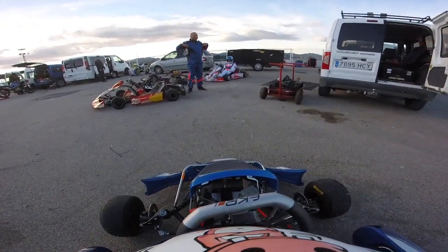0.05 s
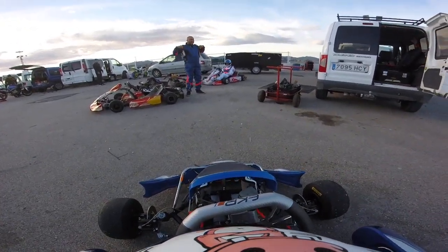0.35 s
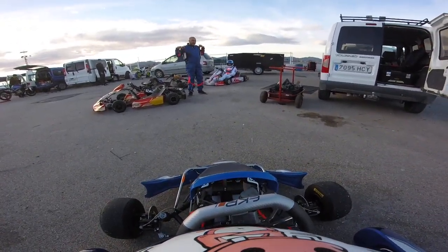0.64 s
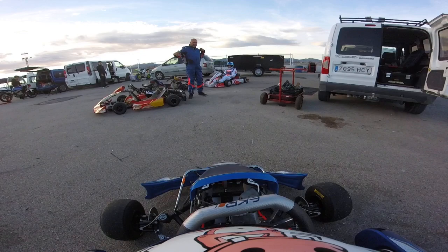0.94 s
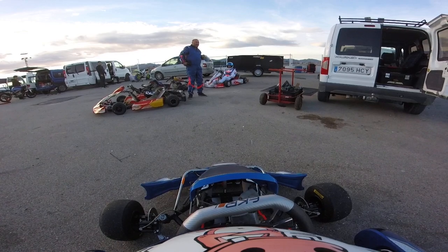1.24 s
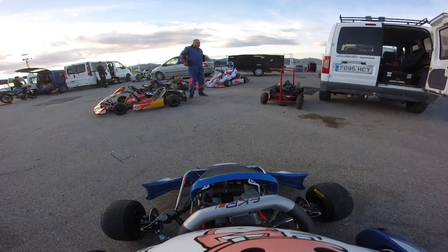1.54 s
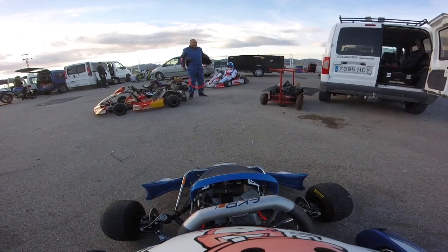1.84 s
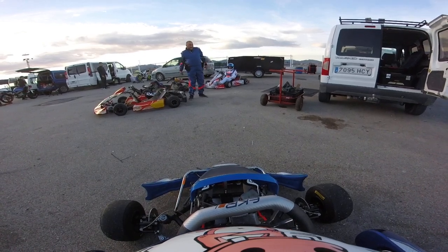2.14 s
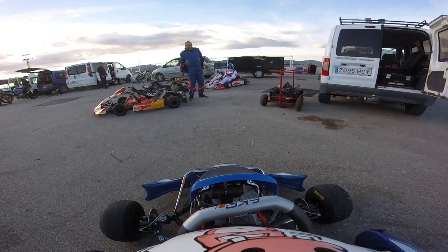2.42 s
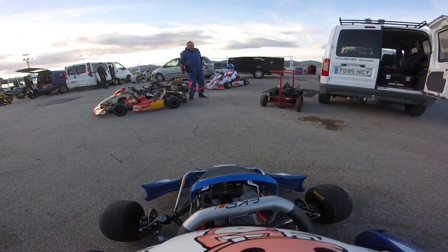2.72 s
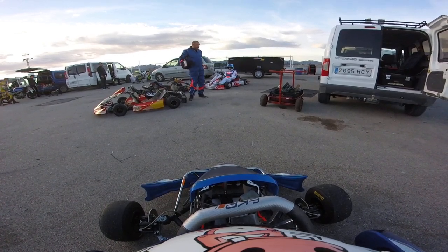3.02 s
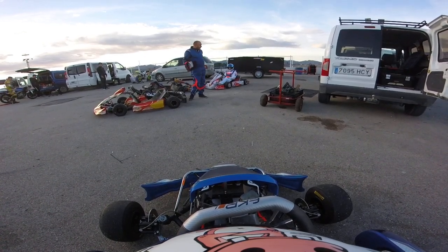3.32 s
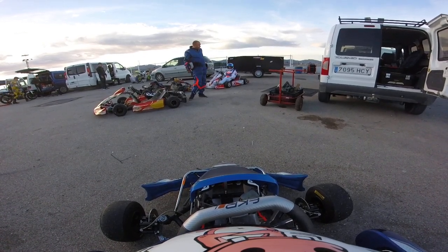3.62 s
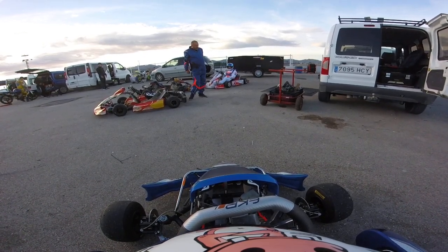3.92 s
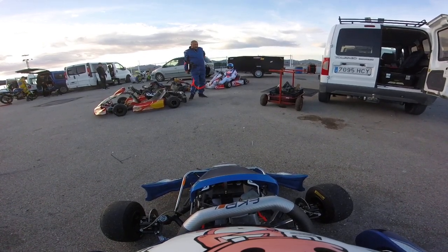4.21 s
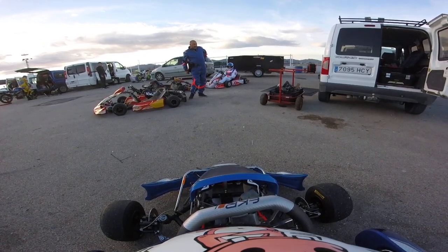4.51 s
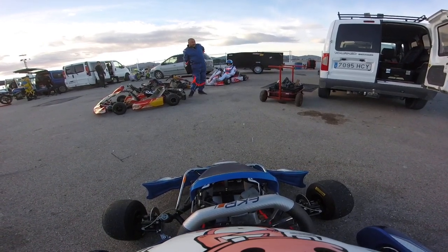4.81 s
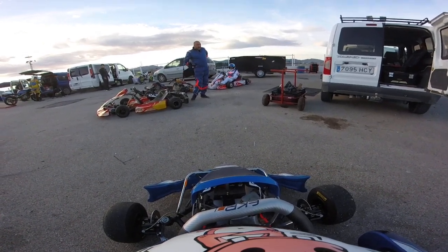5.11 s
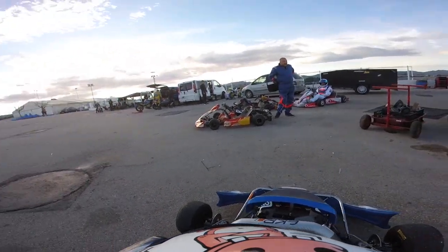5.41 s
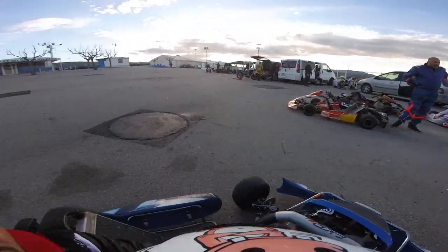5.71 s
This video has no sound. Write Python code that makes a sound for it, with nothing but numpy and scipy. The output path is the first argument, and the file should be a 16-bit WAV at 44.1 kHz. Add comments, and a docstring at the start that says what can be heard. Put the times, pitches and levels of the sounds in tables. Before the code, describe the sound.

A two-stroke racing kart engine idles throughout, heard close up from the seat in an open paddock. The exhaust booms in low, choppy, irregular throbs, with a falling drone in the gaps where the engine coasts. A quieter metallic clatter and faint hiss run underneath, and loose bodywork buzzes and knocks lightly on the stronger beats. For the first 1.2 seconds there are light, almost even metallic ticks. The engine speeds up briefly around 1.4 seconds, sags by about 2.1, picks up again near 2.5, then throbs more densely from about 3 seconds on. At about 5.2 seconds a short scuff and a bump sound right on the microphone. The boom then recedes and the mechanical clatter comes forward, with a few more dull bumps and a low gust of air just before 6 seconds.

```python
"""An open paddock, from the seat of an idling racing kart, the microphone close to its two-stroke single.
The engine fires only on some turns and coasts down between them, so the silencer booms in choppy throbs
with a falling drone between. The mechanism clatters on every turn, strong throbs buzz the bodywork,
and the slack drive ticks at first. At the end the microphone swings towards the engine with a scuff
and a few bumps: the boom recedes and the clatter comes forward."""
import sys
import numpy as np
from scipy import signal
from scipy.fft import rfft, irfft, next_fast_len
from scipy.io import wavfile
from scipy.ndimage import uniform_filter1d, minimum_filter1d

SR = 44100
rng = np.random.default_rng(int(sys.argv[2]) if len(sys.argv) > 2 else 0)


def generate_wav(sig):
    """Save sig (samples, or channels by samples) to the path in sys.argv[1] as 16-bit PCM at SR."""
    pcm = np.round(np.clip(np.atleast_2d(sig).T, -1, 1) * 32767).astype(np.int16)
    wavfile.write(sys.argv[1], SR, pcm)


N = 262395
TIME = np.arange(N) / SR

# a scuff right by the microphone: time_s, level_db
SCUFF_LEVEL = [(5.15, -81), (5.19, -41.5), (5.215, -41), (5.235, -34), (5.255, -35), (5.27, -71)]
# tone of that scuff: frequency_hz, gain_db
SCUFF_SPECTRUM = [(100, -4.5), (300, 8), (700, -1), (1500, 1), (2500, -2.5), (4000, -8), (6500, -21.5),
                  (9000, -34.5), (16000, -43)]
# air buffeting the swinging microphone: time_s, level_db
BUFFET_LEVEL = [(5.5, -55), (5.78, -36), (5.85, -32), (5.9, -38), (5.95, -19)]
# bumps on the microphone: crest_s, level_db, pitch_hz, half_length_s
MIC_BUMPS = [(5.255, -22, 138, 0.02), (5.76, -25.5, 123, 0.011), (5.85, -11.5, 24.3, 0.013),
             (5.92, -22.5, 120, 0.015)]

# ringing of the slack drive: pitch_hz, width_hz, gain_db
DRIVE_MODES = [(1750, 350, 4), (2860, 39, -2), (3170, 230, 0.5), (3860, 270, -3.5)]
# outright knocks of the bodywork: start_s, level_db
PANEL_KNOCKS = [(0.349, -42.5), (1.138, -48), (1.248, -38), (2.012, -44), (2.067, -40), (2.203, -42),
                (2.283, -45), (2.368, -43), (2.46, -47.5), (3.108, -43.5), (3.743, -42.5), (3.807, -41.5),
                (3.865, -41.5), (4.345, -42), (4.839, -47.5), (4.929, -43)]
# dull rattle of the panels: frequency_hz, gain_db
RATTLE_SPECTRUM = [(100, -2), (220, 6), (330, 2), (520, 0), (800, -7), (1500, -12.5), (3000, -13.5),
                   (5000, -28), (10000, -45.5), (16000, -60)]
# sharp crackle of the panels: frequency_hz, gain_db
CRACKLE_SPECTRUM = [(500, -15.5), (2000, -0.5), (5000, -2.5), (8000, -9), (12000, -21), (16000, -21.5)]

# clatter at the microphone before speed adds to it, rising with the swing: time_s, level_db
CLATTER_LEVEL = [(0, -54.5), (1.9, -54), (2.15, -57), (2.55, -55), (3.0, -52), (3.42, -52), (3.52, -56.5),
                 (4.5, -56), (5.0, -51), (5.35, -53), (5.6, -48.5), (5.9, -44)]
# ringing of crankcase, cylinder and drive together: pitch_hz, width_hz, gain_db
CASE_MODES = [(978, 34, -5.5), (1330, 90, -1.5), (1484, 74, 0.5), (1740, 260, -2.5), (2077, 62, -5),
              (2268, 130, -7.5)]
# whirr under that ringing: frequency_hz, gain_db
WHIRR_SPECTRUM = [(120, -8.5), (250, 2), (500, 0), (750, -7), (1100, -7.5), (1500, -7), (2400, -15),
                  (3500, -13), (4300, -27), (7000, -36), (16000, -73)]
# higher ring of the cylinder: pitch_hz, width_hz, gain_db
CYLINDER_MODES = [(2682, 69, 0.5), (2865, 68, 0), (3098, 55, -1.5), (3360, 210, -5), (3640, 190, -4),
                  (4030, 230, -12)]
# hiss of gas: frequency_hz, gain_db
HISS_SPECTRUM = [(2500, -31.5), (4000, -8.5), (4500, -4), (5050, 0), (5550, -4), (5850, -3.5), (6080, 5.5),
                 (6350, -1.5), (6700, -9), (8000, -10.5), (10000, -17), (13000, -30.5), (16000, -31.5)]
# the two bands in which the inlet sings: pitch_hz, width_hz, gain_db
INLET_MODES = [(3020, 160, 1), (5960, 220, -9)]

# exhaust pipe as heard from the seat: time_s, level_db
PIPE_LOUDNESS = [(0, -24), (.12, -43), (.65, -36), (1.09, -48), (1.15, -35), (1.95, -34), (2.52, -40.5),
                 (2.6, -34.5), (3.02, -33.5), (3.95, -39.5), (4.6, -38), (5.26, -32), (5.35, -45),
                 (5.75, -40.5), (5.95, -44.5)]
# resonances of the pipe: pitch_hz, width_hz
PIPE_MODES = [(142, 9.9), (185, 85)]
# how the pipe passes multiples of the crank speed: frequency_hz, gain_db
PIPE_RESPONSE = [(80, -43), (105, -10), (128, 9), (150, 6.5), (170, -8), (205, -0.5), (235, -15.5),
                 (450, -39.5)]
# how the silencer passes them: frequency_hz, gain_db
SILENCER_RESPONSE = [(25, -29), (45, -16.5), (58, 0.5), (70, 7), (86, -2), (98, -13.5), (112, -29),
                     (150, -46.5)]
# coasts, when the unfired engine pumps air through the silencer: start_s, length_s, level_db
COAST_SPANS = [(0, 0.15, -11), (0.58, 0.17, -10.5), (0.877, 0.17, -11), (1.536, .13, -17), (1.949, .18, -9),
               (2.562, 0.13, -19), (3.725, 0.17, -9)]
# crank speed, pushed up by runs of firings and sagging between them: time_s, turns_per_s
CRANK_SPEED = [(0, 37.5), (.2, 32.5), (.38, 40.5), (.78, 31.5), (.87, 36), (1.1, 32), (1.22, 44),
               (1.34, 44), (1.44, 63), (1.6, 58), (2.0, 35.6), (2.17, 29), (2.3, 39.6), (2.53, 55),
               (2.9, 46.2), (3.6, 38.5), (3.87, 33), (4.4, 41.6), (5.2, 44), (5.35, 54), (5.6, 52),
               (5.95, 39)]
# strong firings, timed at the crest of the boom: crest_s, level_db
STRONG_FIRINGS = [(0.219, -15), (0.253, -10.5), (0.284, -9.5), (.375, -5.5), (0.459, -9), (0.515, -12.5),
                  (.805, -9.5), (1.105, -18), (1.156, -8), (1.18, -8), (1.228, -6.5), (1.252, -6),
                  (1.364, -5.5), (1.445, -15), (1.489, -15.5), (1.857, -8.5), (2.176, -11.5), (2.227, -5),
                  (2.287, -8), (2.377, -8), (2.481, -10), (2.772, -16.5), (2.858, -12.5), (2.9, -12.5),
                  (2.992, -6.5), (3.064, -11.5), (3.111, -10.5), (3.172, -9), (3.227, -9.5), (3.313, -13.5),
                  (3.34, -5.5), (3.415, -6.5), (3.446, -3.5), (3.501, -10), (3.576, -8), (3.659, -8),
                  (3.912, -5.5), (3.97, -8), (4.019, -11.5), (4.08, -11.5), (4.249, -6.5), (4.353, -5.5),
                  (4.412, -14.5), (4.549, -14), (4.655, -9.5), (4.798, -14), (4.844, -8.5), (4.887, -8),
                  (4.94, -19), (4.991, -12.5), (5.035, -9.5), (5.082, -7.5), (5.116, -6), (5.161, -8),
                  (5.232, -3.5), (5.279, -6.5)]

IDLE_TURNS_PER_S = 41
BOOM_HALF_S = 0.018
SWING_START_S, SWING_LENGTH_S = 5.27, 0.3


def from_db(db):
    """Decibels to gain."""
    return 10 ** (np.asarray(db) / 20)


def rms_one(x):
    """Scale to rms 1."""
    return x / np.sqrt(np.mean(x ** 2) + 1e-20)


def in_time(curve):
    """A curve's value at every sample."""
    return np.interp(TIME, *np.transpose(curve))


def at_hz(spectrum, hz):
    """Gain of a spectrum at the given frequencies."""
    points, db = np.transpose(spectrum)
    return from_db(np.interp(np.log(hz), np.log(points), db))


def resonate(x, hz, width_hz):
    """One resonance with gain 1 at its peak."""
    r = np.exp(-np.pi * width_hz / SR)
    feedback = [1, -2 * r * np.cos(2 * np.pi * hz / SR), r * r]
    return signal.lfilter(np.array([1, 0, -1]) * (1 - r * r) / 2, feedback, x + 1e-18)


def ring(x, modes):
    """Resonances side by side, signs alternating."""
    return sum((-1) ** k * from_db(db) * resonate(x, hz, width)
               for k, (hz, width, db) in enumerate(modes))


def cut(x, hz, kind, order):
    """Low- or high-pass."""
    return signal.sosfilt(signal.butter(order, hz, kind, fs=SR, output="sos"), x + 1e-18)


def colour(x, spectrum):
    """Shape x by a spectrum; white noise keeps its level."""
    size = next_fast_len(N + SR // 10)
    gain = at_hz(spectrum, np.arange(size // 2 + 1) * SR / size + 1)
    return irfft(rfft(x, size) * rms_one(gain), size)[:N]


def even(x, seconds):
    """Hold the rms near 1 over the given time; quicker throbs stay."""
    size = max(int(seconds * SR), 2)
    power = uniform_filter1d(uniform_filter1d(x * x, size), size)
    return x / np.sqrt(np.abs(power) + 1e-20)


def humps(times, levels_db, rise_s):
    """A hump starts at each time, peaks at its level after rise_s and dies away."""
    clicks = np.zeros(N)
    np.add.at(clicks, np.clip((times * SR).astype(int), 0, N - 1), from_db(levels_db))
    r = np.exp(-1 / (rise_s * SR))
    return signal.lfilter([np.e / (rise_s * SR)], [1, -2 * r, r * r], clicks + 1e-18)


def bursts(rows):
    """Bell-shaped tones from rows of crest_s, level_db, pitch_hz, half_length_s; 0 Hz gives the shape."""
    out = np.zeros(N)
    for s, db, hz, half_s in rows:
        near = slice(max(int(s * SR) - SR // 10, 0), int(s * SR) + SR // 10)
        age = TIME[near] - s
        out[near] += from_db(db) * np.exp(-.5 * (age / half_s) ** 2) * np.cos(2 * np.pi * hz * age)
    return out


def grains(per_s, spread_db):
    """Random ticks of uneven size, rms 1."""
    sizes = from_db(spread_db * np.minimum(rng.exponential(1, N), 4)) * rng.choice([-1, 1], N)
    return rms_one(sizes * (rng.random(N) < per_s / SR))


def turn_times(turns):
    """The moment at which each crank turn begins."""
    return np.interp(np.arange(int(turns[-1])), turns, TIME)


def orders(turns, speed, response, count):
    """Tones at multiples of the crank speed, weighted by a response; rms 1."""
    gains = [at_hz(response, k * speed) for k in range(1, count + 1)]
    tones = sum(g * np.cos(2 * np.pi * k * turns) for k, g in enumerate(gains, 1))
    return tones / np.sqrt(sum(g * g for g in gains) / 2)


def swing_away(loss_db):
    """Gain of a source that the microphone swings away from."""
    return from_db(-loss_db * np.clip((TIME - SWING_START_S) / SWING_LENGTH_S, 0, 1))


def handling():
    """Right at the microphone as it turns: a short scuff, bumps and a low gust of air."""
    scuff = from_db(in_time(SCUFF_LEVEL)) * colour(grains(per_s=6200, spread_db=5), SCUFF_SPECTRUM)
    air = cut(rng.standard_normal(N), 42, "low", order=2)
    gust = even(cut(air, 35, "high", order=2), seconds=0.051)
    return scuff + bursts(MIC_BUMPS) + from_db(in_time(BUFFET_LEVEL)) * gust


def drive_ticks(first_s=0.094, every_s=0.086, scatter_s=0.0049, count=14):
    """In the slow opening idle the drive takes up its slack with almost even metallic ticks."""
    late, harder = rng.standard_normal((count, 2)).T
    times = first_s + every_s * np.arange(count) + scatter_s * late
    touches = humps(times, levels_db=-35 + 2.5 * harder, rise_s=0.0021) * rng.standard_normal(N)
    return cut(ring(touches, DRIVE_MODES), 5500, "low", order=6)


def bodywork(boom, buzz_db=-52, fizz_db=-61.5, rattle_db=-46.5, crackle_db=-60):
    """Loose panels near the seat buzz on the boom's crests, rattle at hard firings and sometimes knock."""
    lead_s, jolt_half_s, knock_rise_s = 0.0036, 0.0054, 0.0039
    crests = (np.maximum(boom, 0) / 0.39) ** 2.4
    # a jolt grows 2.3 dB per dB of firing, counted from a firing of -7 dB
    jolts = [(s, 2.3 * (db + 7)) for s, db in STRONG_FIRINGS]
    knock_times, knock_db = np.transpose(PANEL_KNOCKS)
    rattle = bursts([(s - lead_s, db + rattle_db, 0, jolt_half_s) for s, db in jolts])
    rattle += humps(knock_times, knock_db + 3, knock_rise_s) + from_db(buzz_db) * crests
    crackle = bursts([(s, db + crackle_db, 0, 2 * jolt_half_s) for s, db in jolts])
    crackle += humps(knock_times, knock_db - 20, 2 * knock_rise_s) + from_db(fizz_db) * crests
    dull = colour(rattle * grains(per_s=5000, spread_db=2), RATTLE_SPECTRUM)
    sharp = colour(crackle * grains(per_s=2200, spread_db=6.5), CRACKLE_SPECTRUM)
    return dull + sharp


def inlet(speed, pulsing, full_db=-58, full_turns_per_s=58, hold_s=0.17):
    """The inlet sings in two narrow bands at the highest speeds and hangs on as the speed falls."""
    held_speed = np.maximum(speed, np.interp(TIME - hold_s, TIME, speed))
    fade_db = 1.7 * np.maximum(full_turns_per_s - held_speed, 0)
    return from_db(full_db - fade_db) * rms_one(ring(pulsing * rng.standard_normal(N), INLET_MODES))


def mechanism(turns, speed):
    """Piston slap and bearings ring in the metal once a turn, over a whirr, gas hiss and the inlet."""
    times = turn_times(turns)
    slap_db = 1 + 15 * (rng.random(len(times)) - .5)
    pulsing = np.sqrt(1 + humps(times, slap_db, rise_s=0.0051) ** 2)
    contacts = pulsing * grains(per_s=12000, spread_db=3.5)
    whirr = rms_one(colour(pulsing * rng.standard_normal(N), WHIRR_SPECTRUM))
    case_ring = rms_one(cut(ring(contacts, CASE_MODES), 2600, "low", order=4))
    case = even(case_ring + whirr, seconds=0.42)
    cylinder_ring = cut(ring(contacts, CYLINDER_MODES), 4200, "low", order=8)
    cylinder = even(cut(cylinder_ring, 2500, "high", order=4), seconds=0.84)
    hiss = even(colour(pulsing * grains(per_s=15000, spread_db=0.5), HISS_SPECTRUM), seconds=0.3)
    # all three follow the clatter's level and grow with each doubling of speed
    clatter_db = in_time(CLATTER_LEVEL)
    drift_db = clatter_db - clatter_db.mean()
    doublings = np.log2(speed / IDLE_TURNS_PER_S)
    case *= from_db(3 + clatter_db + 3 * doublings)
    cylinder *= from_db(-57.5 + 0.83 * drift_db + 3.5 * doublings)
    hiss *= from_db(-67 + 0.99 * drift_db + 3.5 * doublings)
    return case + cylinder + hiss + inlet(speed, pulsing)


def frame(turns, rocking_db=-24.5, rumble_db=-26.5):
    """The piston rocks the frame under the seat once a turn; uneven running adds a rumble."""
    rocking = from_db(rocking_db) * np.sin(2 * np.pi * turns)
    low_noise = cut(rng.standard_normal(N), 52, "low", order=4)
    rumble = from_db(rumble_db) * even(cut(low_noise, 22, "high", order=2), seconds=0.14)
    return swing_away(loss_db=19) * (rocking + rumble)


def exhaust_pipe(turns, speed, load_half_s=0.02):
    """The pipe drones in clean overtones, which give way to a rough puff at each strong firing."""
    surges = bursts([(s, db, 0, BOOM_HALF_S) for s, db in STRONG_FIRINGS])
    puffs = (0.84 + surges) * rng.standard_normal(N)
    for hz, width in PIPE_MODES:
        puffs = resonate(puffs, hz, width)
    puffs = even(cut(puffs, 97, "high", order=3), seconds=0.63)
    load = np.minimum(bursts([(s, 0, 0, load_half_s) for s, _ in STRONG_FIRINGS]), 1)
    overtones = from_db(-4 - 3.5 * load) * orders(turns, speed, PIPE_RESPONSE, count=9)
    return from_db(in_time(PIPE_LOUDNESS)) * (overtones + from_db(-4.5 + 1.7 * load) * puffs)


def coasting_drone(turns, speed, floor_db=-24, attack_s=0.11, release_s=0.017):
    """Air pumped through the silencer drones faintly all along and swells in every coast."""
    gain = from_db(floor_db)
    for start_s, length_s, db in COAST_SPANS:
        ramps = np.minimum((TIME - start_s) / attack_s, (start_s + length_s - TIME) / release_s)
        gain = np.maximum(gain, from_db(db) * np.clip(ramps + .5, 0, 1))
    return gain * orders(turns, speed, SILENCER_RESPONSE, count=4)


def firing_booms(turns, speed, idle_pitch_hz=76.1, weak_chance=0.41, weak_db=-22):
    """Each firing booms, a little higher at speed; chance turns between strong firings fire feebly."""
    times = turn_times(turns)
    gap_s = np.abs(times[:, None] - np.array(STRONG_FIRINGS)[:, 0]).min(axis=1)
    fires_weakly = (rng.random(len(times)) < weak_chance) & (gap_s > 2 * BOOM_HALF_S)
    firings = STRONG_FIRINGS + [(s, weak_db) for s in times[fires_weakly]]
    pitch_hz = idle_pitch_hz + 0.4 * (speed - IDLE_TURNS_PER_S)
    return bursts([(s, db, np.interp(s, TIME, pitch_hz), BOOM_HALF_S) for s, db in firings])


def silencer(turns, speed, booms, boom_gain_db=0.5, murmur_db=-27.5):
    """Close to the seat, the silencer lets out the booms, the drone and a murmur of turbulent gas."""
    flow = colour(rng.standard_normal(N), SILENCER_RESPONSE + [(300, -100)])
    murmur = from_db(murmur_db) * even(flow, seconds=0.028)
    outlet = from_db(boom_gain_db) * booms + coasting_drone(turns, speed) + murmur
    return swing_away(loss_db=5) * outlet


def limiter(x, ceiling_db=-5.5, release_db_per_s=28.5, attack_s=0.014):
    """The gain ducks just ahead of every peak over the ceiling and recovers slowly."""
    over_db = np.maximum(20 * np.log10(np.abs(x[0]) + 1e-9) - ceiling_db, 0)
    recovery_db = release_db_per_s * TIME
    gain_db = recovery_db - np.maximum.accumulate(over_db + recovery_db)
    size = int(attack_s * SR)
    held_db = minimum_filter1d(gain_db, 2 * size)
    return x * from_db(uniform_filter1d(uniform_filter1d(held_db, size), size))


def scene():
    """One microphone at the seat: exhaust, frame, mechanism, panels, drive ticks and handling."""
    speed = in_time(CRANK_SPEED)
    turns = np.cumsum(speed) / SR
    booms = firing_booms(turns, speed)
    pipe = exhaust_pipe(turns, speed)
    throb = silencer(turns, speed, booms)
    engine = throb + pipe + frame(turns) + mechanism(turns, speed)
    return (engine + bodywork(throb) + drive_ticks() + handling())[None]


def record(dry, fade_s=0.012, cutoff_hz=15800):
    """A limiter holds the booms down, the sound eases in and out, the top is cut."""
    edges = np.clip(np.minimum(TIME, TIME[-1] - TIME) / fade_s, 0, 1)
    low_pass = signal.ellip(10, .1, 80, cutoff_hz, fs=SR, output="sos")
    return signal.sosfilt(low_pass, limiter(dry) * np.sin(edges * np.pi / 2) ** 2)


dry = scene()
out = record(dry)
generate_wav(out)
```